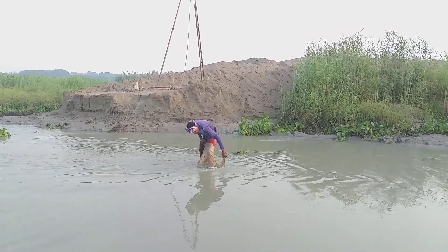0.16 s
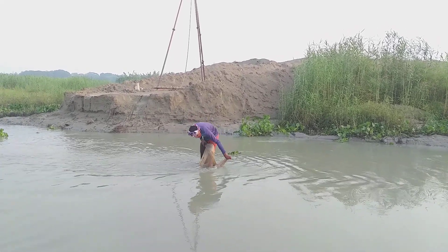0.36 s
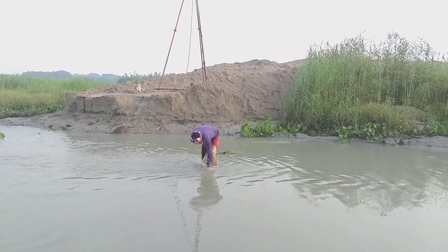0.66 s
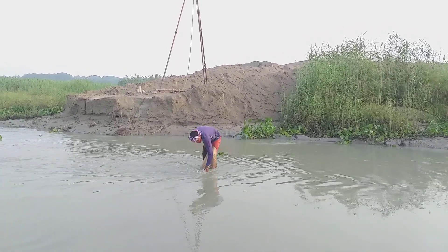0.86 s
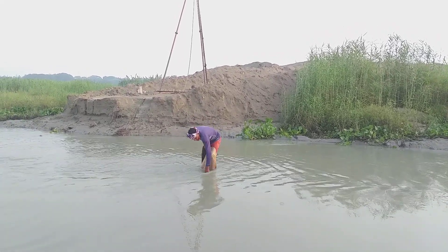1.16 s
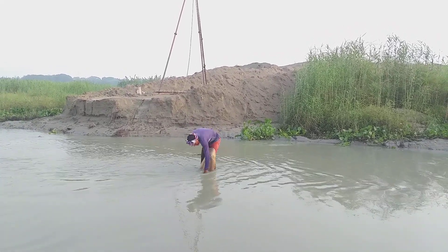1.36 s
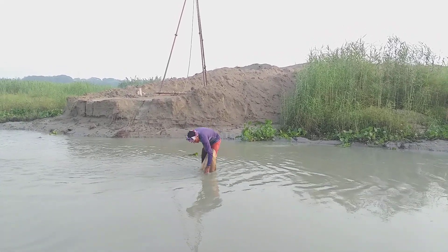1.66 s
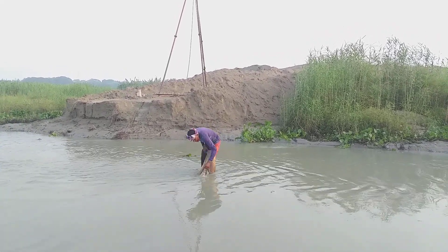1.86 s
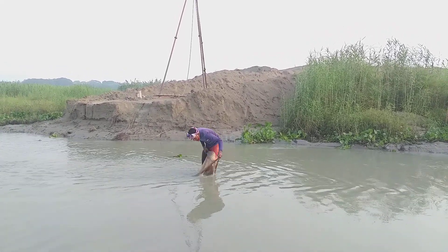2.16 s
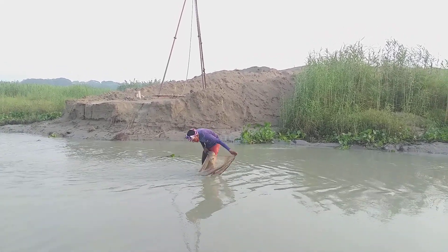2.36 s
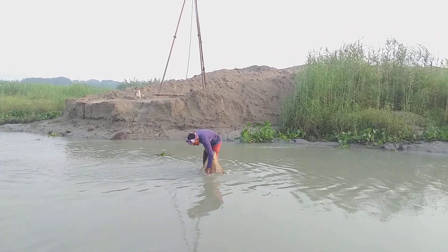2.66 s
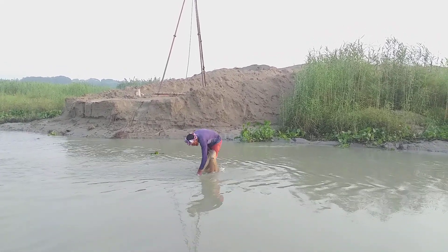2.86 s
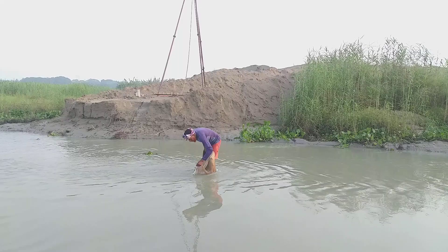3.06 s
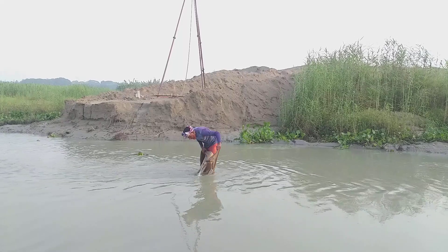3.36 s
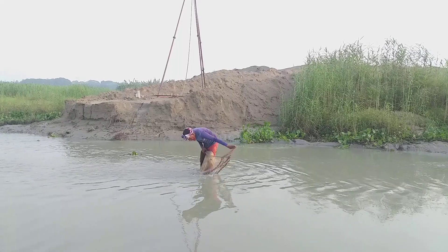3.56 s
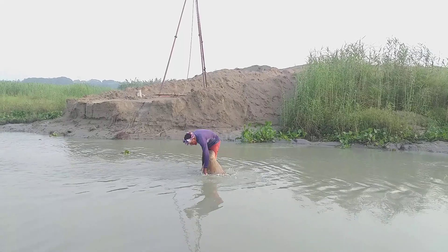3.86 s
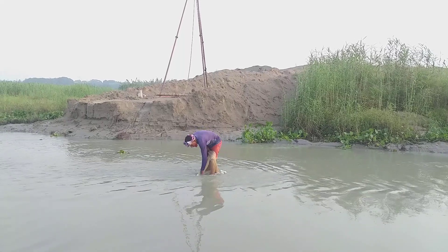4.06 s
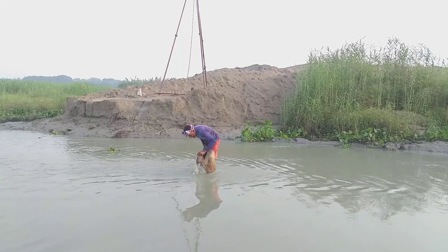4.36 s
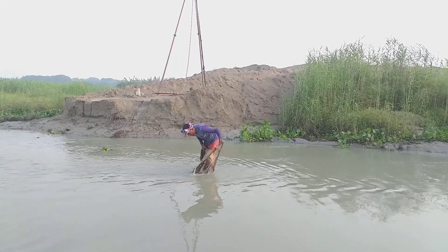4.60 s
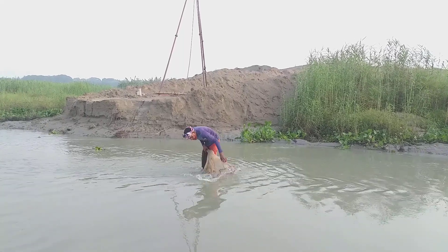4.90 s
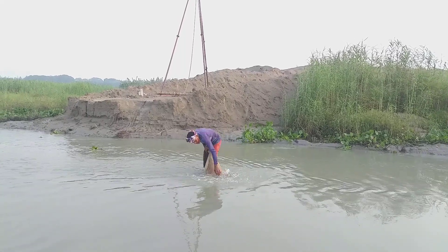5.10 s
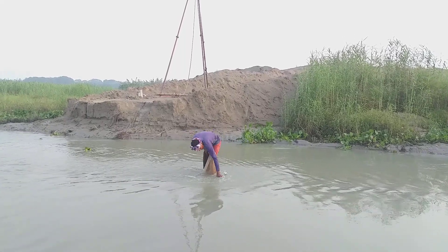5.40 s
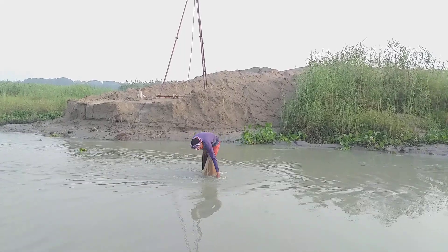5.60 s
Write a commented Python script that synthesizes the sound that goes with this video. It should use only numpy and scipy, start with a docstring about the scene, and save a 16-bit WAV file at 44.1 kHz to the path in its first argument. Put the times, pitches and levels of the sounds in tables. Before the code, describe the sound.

Some metres away in a shallow river, a man works a hand net. Crisp splashes come at the start and at half a second, then light dripping and trickling. Bigger plunges follow around 2.6, 3.8 and 4.9 seconds, with gulping bubbles. A small bird sings quick high phrases after one second and again near the end. Dull handling bumps on the microphone; quiet open air, faint hiss.

```python
"""A shallow river with a mud bank and reeds; a man sweeps a hand net some metres from the microphone.
The lifted net drains in drips and streams; each plunge throws spray and folds air under; water gulps
round his legs. The water is swarms of ringing bubbles and coloured noise, single drops chirp upward.
Small birds, gliding pure tones, sing near and far over still air, hissing reeds and a low rumble.
The hand that holds the microphone bumps its case, which rocks in two short low modes."""
import sys
import numpy as np
from scipy import signal
from scipy.fft import rfft, irfft, next_fast_len
from scipy.io import wavfile
from scipy.ndimage import uniform_filter1d

SR = 44100
rng = np.random.default_rng(int(sys.argv[2]) if len(sys.argv) > 2 else 0)


def inscribe(sig):
    """Save sig as 16-bit PCM at rate SR to the path in sys.argv[1].

    A 1-D sig is mono; a 2-D sig holds one channel per row.
    Samples are clipped to [-1, 1] before scaling.
    """
    pcm = np.round(np.clip(np.atleast_2d(sig).T, -1, 1) * 32767)
    wavfile.write(sys.argv[1], SR, pcm.astype(np.int16))


N = 253134
TIME = np.arange(N) / SR


def from_db(db):
    """Decibels to gain."""
    return 10 ** (np.asarray(db) / 20)


def rms_one(x):
    """Scale to unit power."""
    return x / np.sqrt(np.mean(x ** 2) + 1e-20)


def add(out, s, sound):
    """Mix a sound in at a time in seconds."""
    at = max(0, round(s * SR))
    out[at:at + len(sound)] += sound[:max(0, N - at)]


def coloured(x, points):
    """Causal (minimum-phase) filter that follows a table of (Hz, dB)."""
    size = 2 * next_fast_len(N // 2 + 4096)
    hz, db = np.transpose(points)
    grid = np.maximum(np.arange(size // 2 + 1) * SR / size, 1)
    gain_db = np.interp(np.log(grid), np.log(hz), db)
    # folding the cepstrum onto positive times makes the filter causal
    cepstrum = irfft(np.log(from_db(gain_db)))
    cepstrum[1:size // 2] *= 2
    cepstrum[size // 2 + 1:] = 0
    response = np.exp(rfft(cepstrum))
    return irfft(rfft(x, size) * response)[:N]


def noise(points):
    """Noise of a given colour, unit power."""
    return rms_one(coloured(rng.standard_normal(N), points))


def evened(x, window_s):
    """Near unit power over a short window; the grains inside it keep their contrast."""
    width = max(3, int(window_s * SR))
    power = uniform_filter1d(uniform_filter1d(rms_one(x) ** 2, width), width)
    return rms_one(x) / np.sqrt(np.maximum(power, 0) + 1e-3)


def filtered(x, order, hz, kind):
    """Butterworth filter, "low" or "high" pass."""
    return signal.sosfilt(signal.butter(order, hz, kind, fs=SR, output="sos"), x)


def bubble(t, hz, cycles, rise):
    """A bubble rings up within a cycle and dies by 60 dB in some cycles; it climbs near the surface."""
    age = t * hz / cycles
    ring = np.sin(2 * np.pi * hz * t * (1 + rise * age / 2))
    return ring * from_db(-60 * age) * (1 - np.exp(-t * hz))


def swarm(per_s, low_hz, high_hz, cycles, rise, spread_db, size):
    """Bubbles of random pitch, strength and damping, born at a rate that can change in time."""
    born = np.flatnonzero(rng.random(N) < per_s / SR)
    pitch, strength, sign, damping = rng.random((len(born), 4)).T[:, :, None]
    hz = low_hz * (high_hz / low_hz) ** pitch
    height = from_db(spread_db * np.minimum(-np.log(1 - strength), 4)) * np.sign(sign - .5)
    # small bubbles die sooner, so each counts for more; a crowded surface shares its energy
    height = height * hz / np.sqrt(per_s[born, None])
    samples = np.arange(size)
    rings = height * bubble(samples / SR, hz, cycles * (.5 + damping), rise)
    places = born[:, None] + samples
    return np.bincount(places.ravel(), rings.ravel(), N + size)[:N]


def bank_echo(x, t60):
    """The mud bank and the reeds scatter back a thin, short tail."""
    t = np.arange(SR // 2) / SR
    tail = rng.standard_normal(len(t)) * from_db(-60 * t / t60) * (1 - np.exp(-t / 0.00496))
    return signal.fftconvolve(x, tail / np.linalg.norm(tail))[:N]


# Colour of the still air at the river. Each row: frequency in Hz, relative density in dB.
AIR_COLOUR = [(15, -23), (25, -20), (107, 4.5), (169, -5), (471, -23.5), (898, -15.5), (1180, -21.5),
              (2780, -30), (3020, -16), (3740, -15), (4640, -6.5), (6410, -21), (8630, -26), (9610, -44),
              (15600, -37.5)]
# Colour of the hiss from the reeds. Each row: frequency in Hz, relative density in dB.
REED_COLOUR = [(2500, -35.5), (3200, -14), (4500, 13.5), (5800, -4.5), (7000, 1.5), (8800, 2), (9500, -18)]


def open_air(air_db=-61.5, reeds_db=-63, rumble_db=-68):
    """Still air, a hiss from the reeds and a low far rumble, each steady coloured noise."""
    rumble = noise([(25, -21.5), (60, -6.5), (110, -0.5), (190, -9), (330, -17.5), (600, -31.5), (3000, -58)])
    air, reeds = noise(AIR_COLOUR), noise(REED_COLOUR)
    return from_db(air_db) * air + from_db(reeds_db) * reeds + from_db(rumble_db) * rumble


# The birds' syllables by name. Each row: time into the note in seconds, pitch in Hz, level in dB.
SYLLABLE_SHAPES = { "zigzag": [(0, 6900, -11), (.008, 6100, -3), (.016, 5100, -2), (.027, 6600, 0),
                   (.038, 5450, 0), (.048, 4700, -12)], "arch": [(0, 3700, -12), (.010, 3900, -2),
                   (.024, 4600, 1), (.032, 3900, -13), (.048, 3150, -17), (.075, 2550, -31)],
                   "dip": [(0, 5000, -6), (.007, 4300, -2), (.016, 3450, -3), (.028, 4200, 0),
                   (.040, 4570, -1), (.052, 4450, -12)], "whistle": [(0, 2650, -6), (.02, 3550, -3),
                   (.04, 3920, 0), (.056, 3930, -14), (.088, 3850, -13), (.1, 3880, -2), (.118, 3920, 1),
                   (.14, 3900, -16)], "hook": [(0, 6100, -8), (.005, 6400, -1), (.012, 5800, 0),
                   (.019, 5400, -4), (.026, 5700, -12)], "slur": [(0, 5700, -6), (.015, 5450, 0),
                   (.04, 5150, -1), (.06, 5400, -6)], }
# The near bird's phrase. Each row: time into the phrase in seconds, syllable, accent in dB, pitch ratio.
NEAR_PHRASE = [(0, "zigzag", -2.5, .98), (.052, "arch", 0, 1.01), (.145, "dip", -0.5, 1.01)]
# The near bird's singing. Each row: phrase start in seconds, level in dB before gain, pitch ratio.
NEAR_SONG = [(1.008, -42, 1.004), (1.236, -41, .99), (1.469, -41.5, 0.98), (5.305, -44.5, .98),
             (5.541, -43.5, 1)]
# Birds farther off. Each row: start in seconds, syllable, level in dB before gain, pitch ratio.
FAR_BIRDS = [(.263, "hook", -49, .98), (.291, "hook", -51, .85), (.332, "hook", -47, 1.0),
             (.35, "hook", -47.5, .77), (.409, "hook", -47, .92), (.434, "hook", -52, .96),
             (3.064, "whistle", -49.5, 1.0), (4.245, "slur", -55, 1.0), (5.17, "slur", -57, .94),
             (5.23, "slur", -56, .97)]


def birds(waver_db=-2.5, gain_db=2.0, echo_db=-14.5):
    """Pure whistles glide through stock syllables; faint, far birds are heard more by their echo."""
    direct, scattered = np.zeros((2, N))
    near = [(s + after, name, db + accent_db, key * ratio)
            for s, db, key in NEAR_SONG for after, name, accent_db, ratio in NEAR_PHRASE]
    for s, name, db, ratio in near + FAR_BIRDS:
        knots, hz, shape_db = np.transpose(SYLLABLE_SHAPES[name])
        t = np.arange(int(knots.max() * SR)) / SR
        pitch = uniform_filter1d(np.interp(t, knots, hz), size=220) * ratio
        level = from_db(db + gain_db + np.interp(t, knots, shape_db)) * signal.windows.tukey(len(t), .1)
        note = level * np.sin(2 * np.pi * np.cumsum(pitch) / SR)
        add(direct, s, note)
        add(scattered, s, note * from_db(.75 * (-38 - db)))  # the fainter, the more echo
    waver = from_db(waver_db * noise([(150, 0), (600, -40), (3000, -120)]))
    return direct * waver + from_db(echo_db) * bank_echo(scattered, t60=0.16)


# Bumps on the microphone's case. Each row: time in seconds, level in dB before filtering.
CASE_BUMPS = [(0.067, -40), (0.116, -39), (0.166, -48), (1.292, -50), (1.352, -29.5), (1.380, -32),
              (1.414, -32.5), (1.465, -36), (1.895, -48), (1.934, -37), (2.334, -49.5), (3.159, -55.5),
              (5.098, -49), (5.283, -50.5)]


def bumps(case_hz=102, case_t60=.065, knock_hz=155, knock_t60=0.018, knock=1.9, low_hz=86, soft_hz=305):
    """A soft touch by the holding hand rocks the case in two heavily damped modes."""
    out, t = np.zeros(N), np.arange(5000) / SR
    rock = np.sin(2 * np.pi * case_hz * t) * from_db(-60 * t / case_t60)
    tap = knock * np.sin(2 * np.pi * knock_hz * t) * from_db(-60 * t / knock_t60)
    for s, db in CASE_BUMPS:
        add(out, s - .002, -from_db(db) * (rock + tap))
    return filtered(filtered(out + 1e-18, 4, low_hz, "high"), 4, soft_hz, "low")


def drips(per_s=60, cycles=70, rise=.42, spread_db=2.0, level_db=-59.0):
    """Stray drips from his arms and the mesh plink upward in pitch."""
    plinks = swarm(np.full(N, per_s), 3430, 5600, cycles, rise, spread_db, size=1200)
    return from_db(level_db) * rms_one(plinks)


def swell(s, rise_s, hold_s, fall_s, db, growth_db=0):
    """Power of one movement of the water: it builds until s, holds (or moves to full level) and dies."""
    # rise and fall times each span 20 dB
    rising = np.maximum(s - TIME, 0) / max(rise_s, .005)
    falling = np.maximum(TIME - s - hold_s, 0) / max(fall_s, .005)
    to_go = np.clip((s + hold_s - TIME) / max(hold_s, .005), 0, 1)
    level_db = db - 20 * (rising + falling) - growth_db * to_go
    return from_db(np.maximum(level_db, -140)) ** 2


# The net is raised and drains. Each row: end of the rise in seconds, length in seconds,
# spray in dB, streams in dB, growth in dB up to those levels; levels are before gain.
NET_LIFTS = [(.25, .18, -55, -93, -1.5), (0.806, .17, -46, -65, 3), (1.015, .08, -52.5, -74.5, -2.5),
             (1.34, .07, -53, -66.5, 0), (1.832, .33, -55.5, -72.5, 3), (2.279, .03, -56, -65.5, 0),
             (2.39, .11, -49.5, -60.5, 8), (2.97, .12, -53.5, -65, -2), (3.225, .19, -51, -60.5, -0.5),
             (3.5, .2, -45, -57.5, 7), (4.208, .03, -52, -67, 0.5), (4.328, .04, -55, -61.5, 4),
             (4.443, .26, -45, -55, 7.5), (5.329, 0.23, -57, -81, 1)]
LIFT_RISE_S, LIFT_FALL_S = .05, .13
# Colour of folded air and running water. Each row: frequency in Hz, filter gain in dB.
SLOSH_COLOUR = [(250, -10.5), (520, -11), (720, -3), (950, 2.5), (1300, -1.5), (1900, 4), (2500, 1),
                (3300, -10.5), (6000, -55)]


def streams(per_s=600, cycles=26, rise=0.66, spread_db=2.5, wash=0.74, low_hz=1350, gain_db=-1.5):
    """Threads of water run off the raised net and patter into the river as small bubbles."""
    power = sum(swell(s, LIFT_RISE_S, length, LIFT_FALL_S, db, growth)
                for s, length, _, db, growth in NET_LIFTS)
    patter = rms_one(swarm(np.full(N, per_s), 1195.5, 2690, cycles, rise, spread_db, size=1000))
    patter = patter + wash * rng.standard_normal(N)
    thin = filtered(coloured(patter, SLOSH_COLOUR), 2, low_hz, "high")
    return from_db(gain_db) * np.sqrt(power) * evened(thin, .03)


# Large air pockets closing round his legs. Each row: time in seconds, level in dB before gain, pitch in Hz.
AIR_POCKETS = [(.058, -43, 890), (.534, -46.5, 996), (.606, -48.5, 805), (.621, -55.5, 574),
               (.643, -45, 1300), (.668, -45, 776), (.758, -49.5, 941), (.778, -56, 680), (.915, -48, 787),
               (1.034, -53, 842), (1.781, -53, 830), (1.811, -62, 1235), (2.59, -42, 940),
               (2.615, -35, 1603), (2.742, -46.5, 766), (3.379, -49.5, 1264), (3.83, -33, 1692),
               (3.891, -38, 848), (4.549, -49, 1032), (4.621, -44.5, 965), (4.749, -44.5, 685),
               (4.827, -33, 1697), (4.883, -37.5, 949), (5.092, -35, 997), (5.094, -52.5, 438),
               (5.099, -50.5, 336.6), (5.292, -46.5, 773), (5.616, -52, 1456)]


def gulps(cycles=32, rise=0.094, swell_s=0.00049, delay_s=0.00184, gain_db=2.5):
    """A cavity closes and rings low."""
    out, t = np.zeros(N), np.arange(4000) / SR
    onset = 1 - np.exp(-t / swell_s)
    for s, db, hz in AIR_POCKETS:
        add(out, s + delay_s, from_db(db + gain_db) * bubble(t, hz, cycles, rise) * onset)
    return out


# Single drops that stand out. Each row: time in seconds, level in dB before colour and gain,
# nominal pitch in Hz.
SINGLE_DROPS = [(.0335, -23.5, 4630), (.1406, -23.5, 4660), (0.1918, -25.5, 4070), (0.209, -28, 3900),
                (0.5174, -28, 4860), (0.5422, -17, 5300), (.617, -30.5, 3900), (0.671, -29, 5350),
                (0.804, -30, 4970), (.967, -23, 6006), (.9952, -32, 4260), (2.5016, -27, 5396),
                (2.552, -20, 6000), (2.6221, -16.5, 3040), (2.6637, -20, 4830), (2.823, -30.5, 4020),
                (2.84, -30.5, 4740), (2.9532, -30.5, 4560), (3.2223, -27, 3180), (3.2924, -29, 5625),
                (3.3152, -28, 5700), (3.334, -25, 5880), (3.368, -24, 4250), (3.5567, -23, 3219),
                (3.5848, -20.5, 4030), (3.668, -22.5, 4923), (3.703, -24.5, 3879), (3.809, -20.5, 4617),
                (3.821, -19, 3692), (3.9889, -24, 4596), (4.035, -33, 4330), (4.189, -36.5, 3825),
                (4.375, -25, 4590), (4.4431, -31, 4560), (4.5014, -28.5, 4000), (4.8647, -16.5, 3788),
                (4.9292, -16.5, 5437), (4.998, -20, 4582), (5.026, -16.5, 4900), (5.5385, -29, 4964)]
# Colour of drops and hard spray. Each row: frequency in Hz, filter gain in dB.
SPRAY_COLOUR = [(1200, -24.5), (2000, -12.5), (2450, -3.5), (2800, -5.5), (3150, 2), (3900, 4), (5400, 4.5),
                (6300, -3), (7500, -12.5), (8800, -16.5), (9600, -36), (15000, -39)]


def drops(cycles=22, rise=1.0, start_ratio=0.847, slap=0.57, spatter=0.65, delay_s=0.001025,
          rebound=0.77, gain_db=-1.5):
    """A drop slaps, spatters and traps a bubble that chirps upward; its rebound traps a smaller one."""
    out, t = np.zeros(N), np.arange(900) / SR
    fade = from_db(-60 * t / .007)
    lags_s = rng.uniform(0.00122, 0.0039, len(SINGLE_DROPS))
    for (s, db, hz), lag_s in zip(SINGLE_DROPS, lags_s):
        impact = slap * (t == 0) + spatter * fade * rng.standard_normal(len(t))
        first = bubble(t, hz * start_ratio, cycles, rise)
        second = rebound * bubble(t, hz * 1.017, cycles, rise)
        add(out, s + delay_s, from_db(db) * (impact + first))
        add(out, s + delay_s + lag_s, from_db(db) * second)
    return from_db(gain_db) * coloured(out, SPRAY_COLOUR)


# Colour of the finest droplets. Each row: frequency in Hz, filter gain in dB.
MIST_COLOUR = [(8000, -17), (9800, -7.5), (11300, 1), (12600, 9), (13800, 0), (15700, -7)]


def mist(mist_db, per_s=1200, spread_db=3.0, wash=0.29, gain_db=1.0):
    """The finest droplets of a splash prickle on the surface: random ticks over a faint wash."""
    strength_db = spread_db * np.minimum(rng.exponential(1, N), 5)
    ticks = (rng.random(N) < per_s / SR) * from_db(strength_db)
    prickle = (ticks + wash) * rng.standard_normal(N)
    return from_db(mist_db + gain_db) * evened(coloured(prickle, MIST_COLOUR), 0.054)


def slosh(slosh_db, per_s=520, crowding=.6, cycles=26, rise=0.32, spread_db=0.0, wash=0.7, gain_db=-2.0):
    """Air folded under by the net and his legs rings as middle-sized bubbles."""
    rate = np.clip(per_s * from_db(crowding * (slosh_db + 60)), 60, 4000)
    babble = rms_one(swarm(rate, 657, 2680, cycles, rise, spread_db, size=1500))
    babble = babble + wash * rng.standard_normal(N)
    return from_db(slosh_db + gain_db) * evened(coloured(babble, SLOSH_COLOUR), 0.031)


# Colour of light dripping, which makes only small bubbles; a hard splash makes larger ones too.
# Each row: frequency in Hz, filter gain in dB.
TRICKLE_COLOUR = [(1200, -29), (2000, -22.5), (2750, -14.5), (3150, -1.5), (3900, 2.5), (5400, 1),
                  (6300, -7.5), (7500, -12.5), (8800, -68), (9600, -45), (15000, -70)]


def spray(spray_db, per_s=1900, crowding=.6, cycles=34, rise=0.45, spread_db=1.5, wash=0.87,
          splash_db=-45, span_db=0.5, gain_db=-0.5):
    """Water falls off the mesh: the harder the sweep, the thicker and the larger the bubbles."""
    rate = np.clip(per_s * from_db(crowding * (spray_db + 48)), 200, 9000)
    fizz = rms_one(swarm(rate, 1911, 7500, cycles, rise, spread_db, size=560))
    fizz = fizz + wash * rng.standard_normal(N)
    hard = .5 + .5 * np.tanh((spray_db - splash_db) / span_db)  # 0 is a trickle, 1 a hard splash
    water = hard * coloured(fizz, SPRAY_COLOUR) + (1 - hard) * coloured(fizz, TRICKLE_COLOUR)
    return from_db(spray_db + gain_db) * evened(water, .03)


# The net or a hand plunges in. Each row: end of the rise in seconds, rise, hold and fall in seconds,
# spray, slosh and mist in dB before gain.
NET_PLUNGES = [(.008, 0.026, 0.088, 0.19, -40.5, -53.5, -68),
               (0.524, 0.027, .014, 0.067, -39.5, -54.5, -68), (2.569, .11, 0.094, .19, -40.5, -50.5, -65),
               (3.79, .28, 0.039, .165, -37.5, -48, -59), (4.82, .21, .235, 0.18, -36, -48.5, -63)]
# Folded air sounds later and outlasts the spray by a share of its fall.
CHURN_LAG_S, CHURN_LINGERS, CHURN_FALL_S = .012, .33, .14
MIST_LAG_S, MIST_RISE_SHARE, MIST_FALL_S = 0.0067, 0.58, 0.095
# His legs and hands stir the water; the brief one at 3.224 s is water pattering off the net. Each row: end of
# the rise in seconds, length in seconds, slosh in dB before gain.
WATER_STIRS = [(0.618, 0.042, -59), (0.718, .15, -64.5), (0.911, 0.044, -58.5), (1.029, .02, -69.5),
               (1.26, 0.044, -69), (1.692, .16, -69.5), (1.953, .04, -71.5), (2.823, .02, -63),
               (3.224, 0.0049, -60), (3.37, .03, -66), (4.521, 0.13, -64), (5.171, 0.062, -82),
               (5.297, 0.03, -67.5), (5.621, 0.021, -67), (5.703, 0.027, -62.5)]
STIR_RISE_S, STIR_FALL_S = .04, .1
# Sheets of water slap back onto the river. Each row: end of the rise in seconds, spray, slosh and
# mist in dB before gain.
SHEET_SLAPS = [(.146, -38, -50, -69.5), (.209, -42.5, -71, -83), (0.672, -50, -57, -84.5),
               (2.555, -35, -54, -56.5), (2.621, -37, -42, -66), (2.75, -48.5, -51, -85),
               (3.817, -35, -44, -59), (3.875, -45, -59, -60), (3.9, -46, -48.5, -85),
               (3.999, -50, -54, -81.5), (4.732, -41.5, -45, -73), (4.828, -41.5, -40.5, -73),
               (4.86, -34.5, -48, -69), (4.934, -34.5, -58, -60.5), (4.977, -38, -63.5, -73.5),
               (5.027, -37.5, -51, -47.5), (5.099, -41.5, -40.5, -63)]
SLAP_RISE_S, SLAP_HOLD_S, SLAP_FALL_S = .022, .003, .03
DRIP_DB, LAP_DB = -62, -78   # the wet net drips and ripples lap all the time; before gain
LIFT_MIST_DB = -42   # relative to the lift's spray


def agitation(flutter_db=0.96, fine_flutter_db=0.8):
    """Levels in dB of spray, slosh and mist: the powers of all movements add up and come in clumps."""
    draining = sum(swell(s, LIFT_RISE_S, length, LIFT_FALL_S, db, growth)
                   for s, length, db, _, growth in NET_LIFTS)
    stirring = sum(swell(s, STIR_RISE_S, length, STIR_FALL_S, db) for s, length, db in WATER_STIRS)
    thrown = from_db(DRIP_DB) ** 2 + draining
    folded = from_db(LAP_DB) ** 2 + stirring
    fine = from_db(LIFT_MIST_DB) ** 2 * draining
    for s, rise, hold, fall, spray_db, slosh_db, mist_db in NET_PLUNGES:
        churn_hold = hold + CHURN_LINGERS * fall
        thrown = thrown + swell(s, rise, hold, fall, spray_db)
        folded = folded + swell(s + CHURN_LAG_S, rise, churn_hold, CHURN_FALL_S, slosh_db)
        fine = fine + swell(s + MIST_LAG_S, MIST_RISE_SHARE * rise, hold, MIST_FALL_S, mist_db)
    slapping = sum(np.outer(from_db(levels_db) ** 2, swell(s, SLAP_RISE_S, SLAP_HOLD_S, SLAP_FALL_S, 0))
                   for s, *levels_db in SHEET_SLAPS)
    clumps = noise([(5, -20), (15, 0), (45, 0), (120, -40), (1000, -120)])
    flutter = np.outer([flutter_db, flutter_db, fine_flutter_db], clumps)
    return 10 * np.log10(slapping + [thrown, folded, fine]) + flutter


def scene():
    """Water and birds lie straight ahead of the microphone, alike in both channels."""
    spray_db, slosh_db, mist_db = agitation()
    water = drips() + streams() + gulps() + drops() + mist(mist_db) + slosh(slosh_db) + spray(spray_db)
    echo = from_db(-13.5) * bank_echo(water, t60=0.17)
    mono = open_air() + birds() + bumps() + echo + water
    return np.array([mono, mono])


# The microphone leans left in a narrow band. Each row: frequency in Hz, left minus right in dB.
LEFT_LEAN = [(1300, 0), (1600, 1.0), (1900, 4.8), (2200, 1.5), (2600, .2), (3000, 0)]


def record(dry, hiss_db=-81.5, cutoff_hz=15750):
    """The two ports differ a little in the middle range and each adds its own hiss; the top is cut."""
    ported = [coloured(x, [(hz, side * db / 2) for hz, db in LEFT_LEAN]) for x, side in zip(dry, (1, -1))]
    heard = ported + from_db(hiss_db) * rng.standard_normal((2, N))
    return signal.sosfilt(signal.ellip(12, .1, 80, cutoff_hz, fs=SR, output="sos"), heard)


dry = scene()
out = record(dry)
inscribe(out)
```